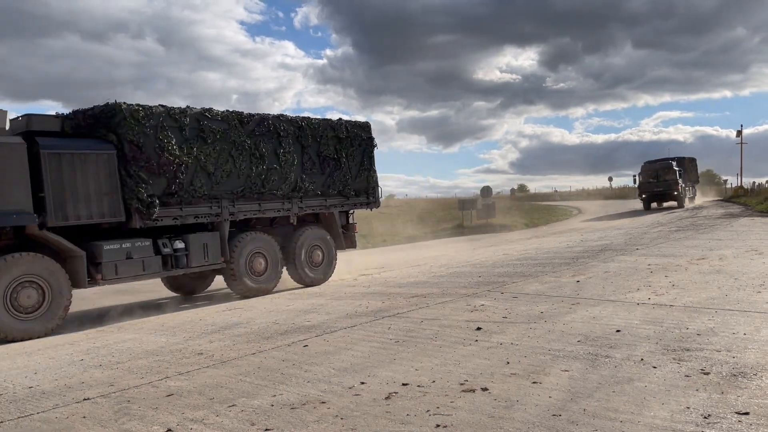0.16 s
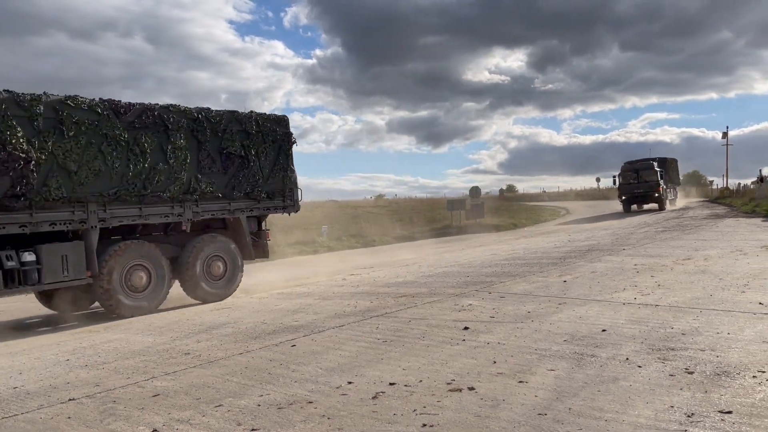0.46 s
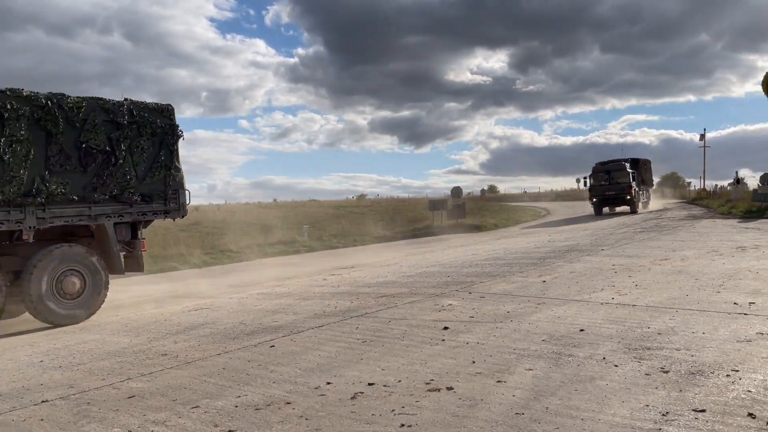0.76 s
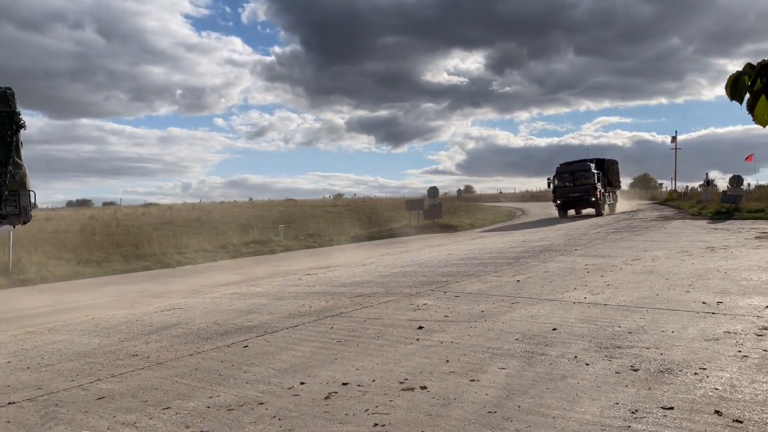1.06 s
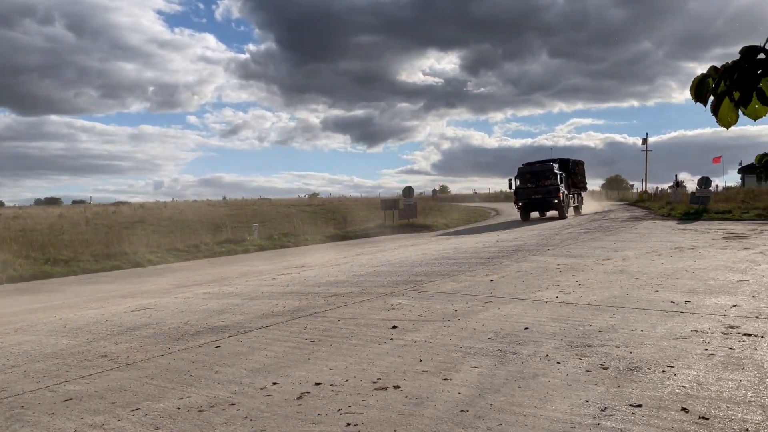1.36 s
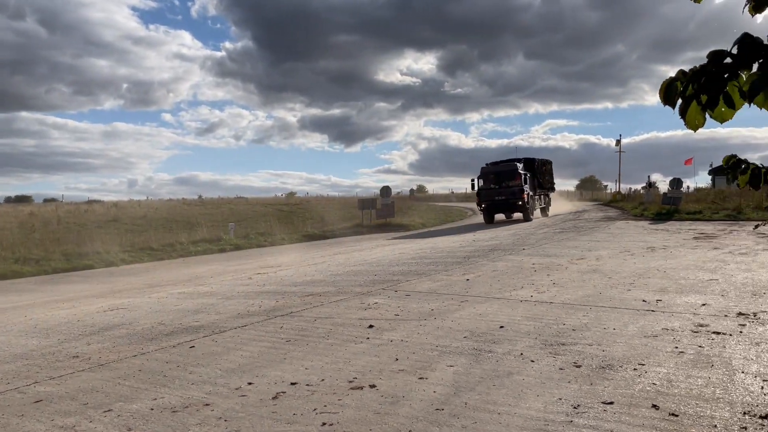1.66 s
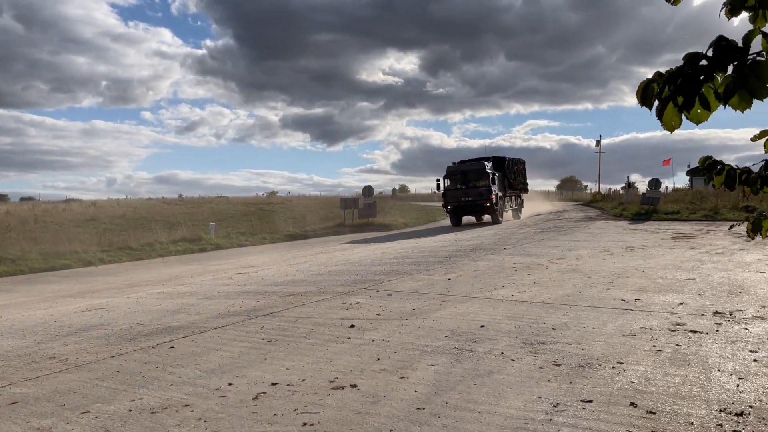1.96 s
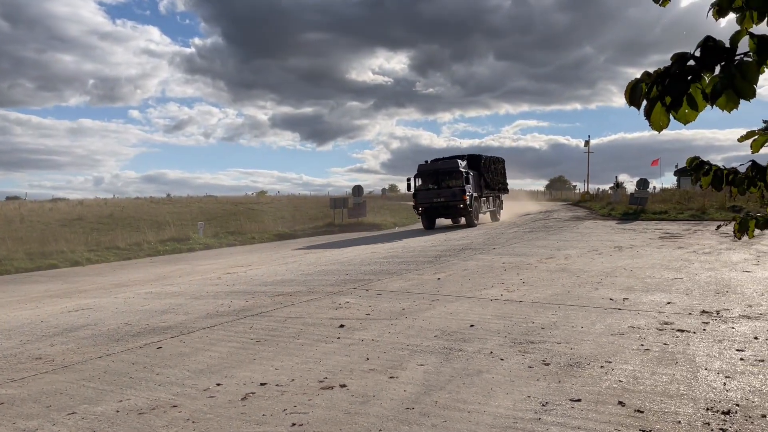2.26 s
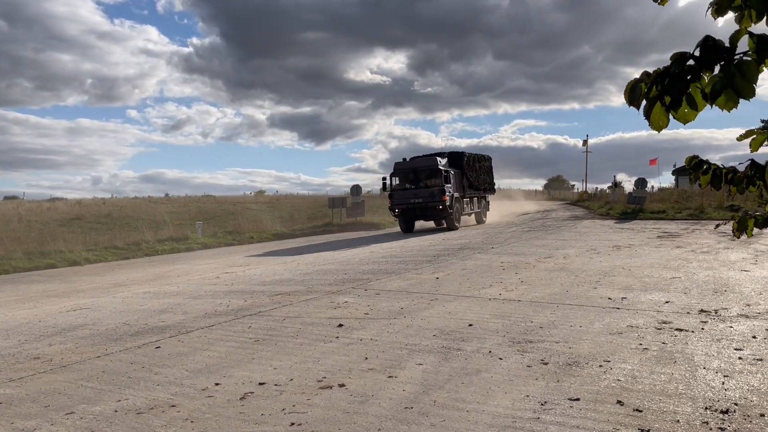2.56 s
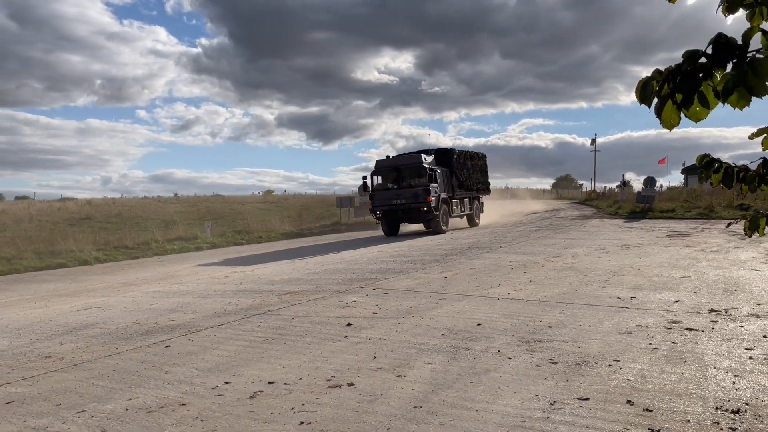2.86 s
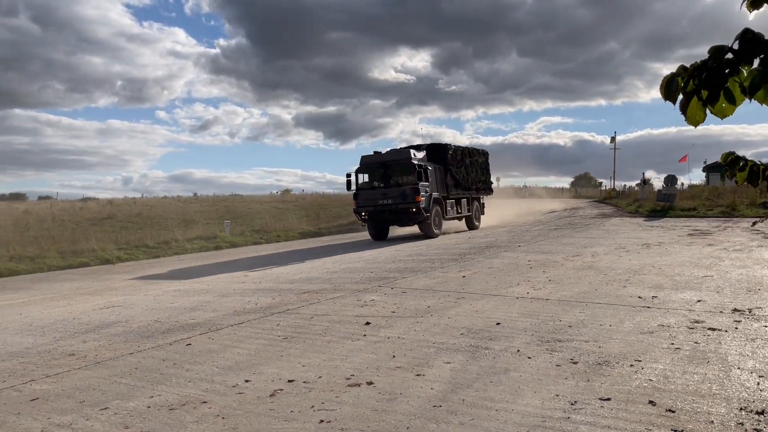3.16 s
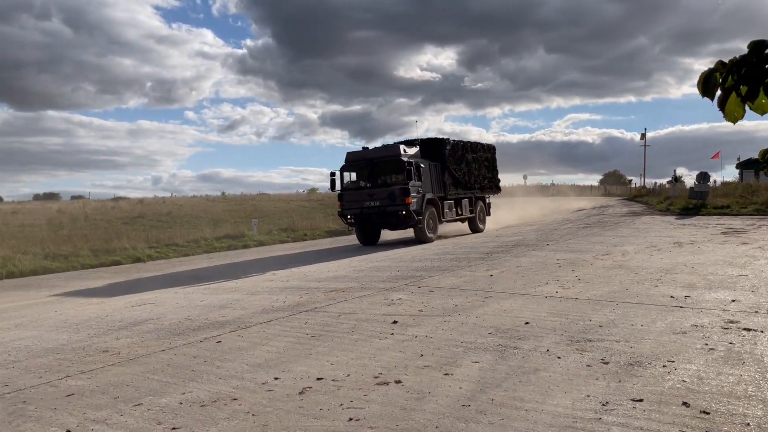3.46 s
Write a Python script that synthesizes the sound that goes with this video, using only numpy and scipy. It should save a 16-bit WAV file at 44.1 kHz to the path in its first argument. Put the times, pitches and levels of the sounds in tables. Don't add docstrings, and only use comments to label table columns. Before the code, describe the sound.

Deep truck engine drone and tyre roar pass to the left, with brake hisses and rattles.

```python
import sys
import numpy as np
from scipy import signal
from scipy.fft import rfft, irfft, next_fast_len
from scipy.io import wavfile
from scipy.ndimage import uniform_filter1d

SR = 44100
rng = np.random.default_rng(int(sys.argv[2]) if len(sys.argv) > 2 else 0)


def transcribe(signal):
    frames = np.atleast_2d(signal).T
    limited = np.clip(frames, -1, 1)
    pcm = np.round(limited * 32767).astype(np.int16)
    wavfile.write(sys.argv[1], SR, pcm)


def makeup_ratio(level_db):
    decades = np.asarray(level_db, float) / 20
    return 10 ** decades


N = 158760
T = np.arange(N) / SR
PAD = 2048
LONG = next_fast_len(N + 2 * PAD)
TURN_FROM_S, TURN_S = 0.16, 1
SWING = np.clip((T - TURN_FROM_S) / TURN_S, 0, 1)


def evened(x):
    return x / np.sqrt(np.mean(x ** 2) + 1e-20)


def read(points, hz):
    f, value = np.transpose(points)
    return np.interp(np.log(hz + 1), np.log(f + 1), value)


def curve(rows, t=T):
    cols = np.transpose(rows)
    return [np.interp(t, cols[0], c) for c in cols[1:]]


def drift(rate_hz):
    rates_hz = np.geomspace(rate_hz / 8, rate_hz, 12)
    return evened(sum(np.sin(2 * np.pi * (f * T + rng.random())) for f in rates_hz))


def spectrum_of(x):
    return rfft(np.pad(x, (PAD, LONG - N - PAD), "reflect"))


def colour(x, gain):
    return irfft(spectrum_of(x) * gain(np.fft.rfftfreq(LONG, 1 / SR)), LONG)[PAD:PAD + N]


def ring(x, hz, width_hz):
    return signal.lfilter(*signal.iirpeak(hz, hz / width_hz, fs=SR), x)


def ring_twice(x, hz, width_hz, second_width_hz):
    return ring(ring(x, hz, width_hz), hz, second_width_hz)


# f/Hz, left lead [rad], left minus right level/dB
ASIDE = [(0, 0, -2.6), (150, .7, -2.4), (600, 2, 3.5), (1100, 2.4, 0), (1450, 4.4, -5), (2000, 5.4, -2.5),
         (3200, 8.2, 0), (4300, 2 * np.pi, 0)]
# f/Hz, left lead [rad], left minus right level/dB
AHEAD = [(0, 0, -2.6), (150, .3, -2.2), (600, .6, 1), (1350, 1.4, 1), (1800, 3.4, 0), (2300, 6.3, .5),
         (3400, 7, 1), (4300, 2 * np.pi, .5)]
# f/Hz, left lead [rad], left minus right level/dB
TREBLE = [(5200, 7.6, -1), (6300, 5.6, -2), (7300, 4.3, -1), (8250, np.pi, 0), (11450, 0, 0),
          (14600, -np.pi, 0), (16500, -3.6, 0)]


def ports(x, aside):
    hz, z, out = np.fft.rfftfreq(LONG, 1 / SR), spectrum_of(x), 0
    for table, share in ((AHEAD, 1 - aside), (ASIDE, aside)):
        lead_rad, lean_db = curve(table + TREBLE, hz)
        half = makeup_ratio(lean_db / 2) * np.exp(.5j * lead_rad)
        pair = irfft(np.array([z * half, z / half]), LONG)
        out = out + share * pair[:, PAD:PAD + N]
    return out


# f/Hz, shared power [0-1]
PORT_LIKENESS = [(60, 1), (250, .95), (2300, 0.68), (3700, 0.9), (5600, 0.3), (7400, 1), (12000, 0.9),
                 (14200, .96)]


def noise(field_db, aside, patchy_db, flicker_db):
    frames, hz = N // 256 + 5, np.fft.rfftfreq(1024, 1 / SR)
    a, b, c, d, e, f, patches, flicker = rng.standard_normal((8, 513, frames))
    patches = evened(uniform_filter1d(uniform_filter1d(patches, size=14, axis=0), size=12, axis=1))
    flicker = evened(uniform_filter1d(uniform_filter1d(flicker, size=150, axis=0), size=3, axis=1))
    level_db = field_db(np.arange(frames) * 256 / SR, hz[:, None])
    gain = makeup_ratio(level_db + patchy_db * patches + flicker_db * flicker)
    same = np.clip(read(PORT_LIKENESS, hz), 0, 1)[:, None]

    def sound(z):
        return signal.istft(z * gain, nperseg=1024, noverlap=768)[1][:N] / 28

    shared = sound((a + 1j * b) * np.sqrt(same))
    left = sound((c + 1j * d) * np.sqrt(1 - same))
    right = sound((e + 1j * f) * np.sqrt(1 - same))
    return ports(shared, aside) + np.array([left, right])


def per_rms(spectrum, hz):
    shape_db = read(spectrum, hz)
    return shape_db - 10 * np.log10(np.sum(10 ** (shape_db / 10)) / 512)


def humps(table, hz):
    return sum(db * np.exp(-((hz - f) / width) ** 2) for f, width, db in table)


def ground(hz, notch_hz, echo):
    echo_top_hz = 2420
    share = np.clip(echo, 0, .9) / (1 + (hz / echo_top_hz) ** 2)
    return 20 * np.log10(abs(1 + share * np.exp(-1j * np.pi * hz / notch_hz)))


def orders(hz, table, waver_db, wobble_rad):
    turns_rad = 2 * np.pi * np.cumsum(hz) / SR
    out = 0
    for multiple, db in table:
        phase = multiple * turns_rad + wobble_rad * drift(5) + 6 * rng.random()
        out = out + np.sqrt(2) * makeup_ratio(db + waver_db * drift(7)) * np.sin(phase)
    return out


# t/s, exhaust level/dB, roar level/dB, ground-echo notch f/Hz
NEAR = [(0, -47, -28.5, 1760), (.6, -37.5, -27.5, 1610), (.78, -26.5, -27.5, 1390), (1.1, -26.5, -26, 1250),
        (1.5, -30, -28, 1220), (1.8, -30.5, -28.5, 1250), (2.15, -31, -28.5, 1450),
        (2.62, -33.5, -33, 1720), (2.74, -38.5, -31.5, 1770), (3.6, -45.5, -34, 1850)]
# t/s, f/Hz
NEAR_FIRING = [(0, 50.3), (.55, 50.4), (.8, 49.5), (1.1, 48.3), (1.5, 47.4), (1.8, 46.5), (2.15, 45.3),
               (2.6, 44.8), (3.6, 45.5)]
# multiple of four-stroke cycle, level/dB
NEAR_ORDERS = [(6, 0), (7, -10), (10, -13), (12, -1), (14, -13), (15, -4), (18, -11), (19, -12), (20, -12),
               (21, -8), (23, -13), (24, -4), (25, -10), (27, -16), (30, -21), (36, -11), (39, -16)]
# multiple of four-stroke cycle, level/dB
BLOCK = [(5, -33), (15, -42), (18, -41), (20, -42), (30, -47), (37, -47)]
# multiple of firing, level/dB
GEARS = [(13, -49), (15.2, -44), (17.6, -50)]
# t/s, f/Hz, level/dB
LUGS = [(0, 63, -29), (.22, 67.5, -27), (.6, 69, -28), (1, 69, -29), (1.35, 66, -26), (1.65, 65, -36),
        (2.05, 63, -27), (2.4, 62, -36), (2.7, 65, -34), (3.6, 64, -35)]
# f/Hz, level/dB per Hz
NEAR_ROAR = [(30, -46), (45, -3.5), (200, -18.5), (500, -20.5), (1200, -19), (2500, -29.5), (6000, -40.5),
             (13800, -58.5)]
# f/Hz, width [Hz], level/dB
NEAR_HUMPS = [(316, 170, 6.5), (479, 72, -1.5), (732, 83, 3.5), (2454, 73, -0.5), (3000, 400, 1),
              (4250, 1000, 0.5)]


def near_truck():
    cylinders, gears_fade_s = 6, 2.5
    growl_hz, growl_width_hz, growl_db = 780, 390, -9.5
    fire_hz = curve(NEAR_FIRING)[0]
    cycle_hz = fire_hz / cylinders
    pipe_db, roar_db, _ = curve(NEAR)
    lug_hz, lug_db = curve(LUGS)

    exhaust = makeup_ratio(pipe_db) * orders(cycle_hz, NEAR_ORDERS, waver_db=2.4, wobble_rad=.5)
    block = makeup_ratio(roar_db + 27) * orders(cycle_hz, BLOCK, waver_db=2.5, wobble_rad=.45)
    gear_fade = np.clip(2 - 2 * T / gears_fade_s, 0, 1)
    gears = gear_fade * orders(fire_hz, GEARS, waver_db=3, wobble_rad=1.6)
    puffs = (1 + .56 * np.cos(2 * np.pi * np.cumsum(fire_hz) / SR)) * rng.standard_normal(N)
    growl = evened(ring_twice(puffs, growl_hz, growl_width_hz, growl_width_hz))
    growl = makeup_ratio(pipe_db + growl_db) * growl
    lugs = makeup_ratio(lug_db) * orders(lug_hz, [(1, 1)], waver_db=1.2, wobble_rad=.4)

    def roar_field_db(t, hz):
        _, level_db, notch_hz = curve(NEAR, t)
        source_db = per_rms(NEAR_ROAR, hz) + humps(NEAR_HUMPS, hz)
        return source_db + level_db + ground(hz, notch_hz, echo=.45)

    roar = noise(roar_field_db, SWING, patchy_db=1, flicker_db=.61)
    return ports(exhaust + block + gears + growl + lugs, SWING) + roar


# t/s, firing f/Hz, exhaust level/dB
FAR = [(0, 82, -48), (1.6, 80, -42), (1.8, 81.8, -29), (2.0, 82, -33), (2.2, 81, -31), (2.4, 82.5, -26),
       (2.62, 83, -26), (2.68, 83.4, -34), (2.78, 83, -24.5), (3.0, 83.5, -29), (3.22, 84.3, -33),
       (3.32, 84, -27), (3.42, 84.5, -23), (3.6, 84.5, -27)]
# multiple of firing, level/dB
FAR_ORDERS = [(1, 0), (1.25, -12), (1.5, -14), (2, -17), (2.41, -18), (2.72, -11), (3, -22)]
# t/s, level/dB
FAR_LEVEL = [(0, -36), (1.5, -39.5), (2.4, -37.5), (2.8, -35.5), (3.2, -33), (3.6, -34)]
# f/Hz, level/dB per Hz
FAR_ROAR = [(30, -39), (45, -14), (200, -15), (600, -19.5), (1900, -24.5), (2700, -31.5), (6000, -43),
            (13800, -70.5)]
# f/Hz, width [Hz], level/dB
FAR_HUMPS = [(660, 78, 2), (1250, 420, 1.5), (1970, 73, -8), (2490, 810, 0.5), (4530, 400, 6.5)]


def far_truck():
    whine_order, whine_from_s, whine_rise_s, whine_db = 6.03, 2.95, .31, -46
    fire_hz, pipe_db = curve(FAR)
    exhaust = makeup_ratio(pipe_db) * orders(fire_hz, FAR_ORDERS, waver_db=1.5, wobble_rad=.55)
    whine_rise = np.clip((T - whine_from_s) / whine_rise_s, 0, 1)
    whine = whine_rise * orders(fire_hz, [(whine_order, whine_db)], waver_db=2, wobble_rad=1.1)

    def roar_field_db(t, hz):
        source_db = per_rms(FAR_ROAR, hz) + humps(FAR_HUMPS, hz)
        return source_db + curve(FAR_LEVEL, t)[0] + ground(hz, notch_hz=1880, echo=.5)

    return ports(exhaust + whine, 0) + noise(roar_field_db, 0, patchy_db=1.5, flicker_db=1.87)


# t/s, level/dB, f/Hz
STONES = [(.7203, -44, 3200), (0.7542, -41, 4500), (0.7542, -46, 6500), (0.8904, -35, 2350),
          (.926, -38, 4000), (0.9484, -37, 2700), (0.9832, -35, 4100), (0.9832, -41, 6500),
          (1.876, -45, 4000), (2.0582, -41, 2300), (2.9861, -39, 2500), (3.3697, -45, 3650)]


def stones():
    ticks_per_s, damping = 150, .3
    chance_db = 3 * np.minimum(rng.exponential(1, N), 4)
    ticks = makeup_ratio(-50 + chance_db + curve(NEAR)[1] + 46) * (rng.random(N) < ticks_per_s / SR)
    out = ring(ticks, 3200, 2100) + makeup_ratio(-2) * ring(ticks, 5400, 2000)
    for start_s, db, hz in STONES:
        u = np.clip(T - start_s, 0, 1) * np.pi * hz * damping
        out = out + makeup_ratio(db + 9) * u * np.exp(1 - u) * np.sin(2 * np.pi * hz * (T - start_s))
    return ports(out, SWING)


# t/s, length [s], level/dB, brightness [dB per octave]
RATTLES = [(.3, .2, -43, 5), (.53, .1, -37, 4), (.885, .08, -38, 3.5), (1.07, .08, -37, 1.5),
           (2.035, .045, -34, .5), (2.14, .065, -32, .5), (2.745, .1, -29, 1.5), (2.85, .035, -37, 3.5),
           (2.975, .07, -36, 3.5), (3.07, .05, -40, 4), (2.26, .06, -39, 2.5)]
# f/Hz, width [Hz], level/dB
PANELS = [(520, 160, 3), (860, 240, 3), (1300, 330, -2), (1750, 400, -5), (2200, 400, -10), (2800, 700, -7),
          (4500, 800, -18)]


def rattles():
    knocks_per_s = 5000
    size = (len(PANELS), N)
    force = makeup_ratio(2 * np.minimum(rng.exponential(1, size), 3))
    struck = rng.random(size) < knocks_per_s / SR
    knocks = force * struck * rng.choice([-1., 1.], size)
    out = np.zeros(N)
    for knock, (hz, width_hz, panel_db) in zip(knocks, PANELS):
        bursts = 0
        for start_s, length_s, db, tilt_db in RATTLES:
            swell = np.sin(np.pi * np.clip((T - start_s) / length_s, 0, 1) ** 1.2)
            bursts = bursts + makeup_ratio(db + tilt_db * np.log2(hz / 1000)) * swell
        panel = evened(ring_twice(knock, hz, width_hz, 2 * width_hz))
        out = out + bursts * makeup_ratio(panel_db - 5) * panel
    return ports(out, SWING)


# t/s, length [s], level/dB, sag [dB]
VENTS = [
    (1.668, .145, -40, -5.5),
    (2.276, .22, -44.5, -9),
    (2.53, .16, -52, -1),
    (1.08, .3, -55, -3),
]
# f/Hz, level/dB per Hz
VENT_SPECTRUM = [(1500, -36), (4000, 5), (7500, 5), (11000, 1.5), (14000, -4), (17000, -31)]


def vents():
    rise_s, close_s = .008, .025
    spit_hz, spit_width_hz, spit_s, spit_db = 15500, 900, .012, -17
    shape, spit = 0, 0
    for start_s, length_s, db, sag_db in VENTS:
        opening = np.clip((T - start_s) / rise_s, 0, 1)
        closing = np.clip((start_s + length_s - T) / close_s + 1, 0, 1)
        spent = np.clip((T - start_s) / length_s, 0, 1) ** .7
        shape = shape + opening * closing * makeup_ratio(db + sag_db * spent)
    for start_s, _, db, _ in VENTS[:2]:
        spit = spit + (T > start_s) * makeup_ratio(db + spit_db) * np.exp(-abs(T - start_s) / spit_s)
    thin = evened(ring_twice(rng.standard_normal(N), spit_hz, spit_width_hz, spit_width_hz))
    jet = noise(lambda t, hz: per_rms(VENT_SPECTRUM, hz) + 0 * t, 1, patchy_db=.6, flicker_db=.4)
    return spit * thin + shape * jet


# t/s, length [s], f/Hz, level/dB
SQUEAKS = [(1.63, .04, 10100, -59), (3.11, .035, 6550, -59), (3.15, .04, 6500, -58), (3.43, .06, 6400, -62),
           (3.33, .06, 10000, -65), (1.68, 0.06, 4400, -54)]


def squeaks():
    friction = rng.standard_normal(N)
    out = 0
    for start_s, length_s, hz, db in SQUEAKS:
        swell = np.sin(np.pi * np.clip((T - start_s) / length_s, 0, 1))
        out = out + makeup_ratio(db) * evened(ring_twice(friction, hz, 180, 180)) * swell
    return ports(out, 0)


def scene():
    return near_truck() + far_truck() + stones() + rattles() + vents() + squeaks()


# f/Hz, level/dB
MIC = [(30, -25), (40, 0), (7000, 3.5), (8300, 12), (9500, 8.5), (13200, 7.5), (14200, 12), (15500, -4)]


def microphone(dry):
    return np.array([colour(channel, lambda hz: makeup_ratio(read(MIC, hz))) for channel in dry])


def roll_off(x):
    return signal.sosfilt(signal.butter(12, 15760, fs=SR, output="sos"), x)


def record(dry):
    mix = microphone(dry)
    return roll_off(mix)


dry = scene()
out = record(dry)
transcribe(out)
```